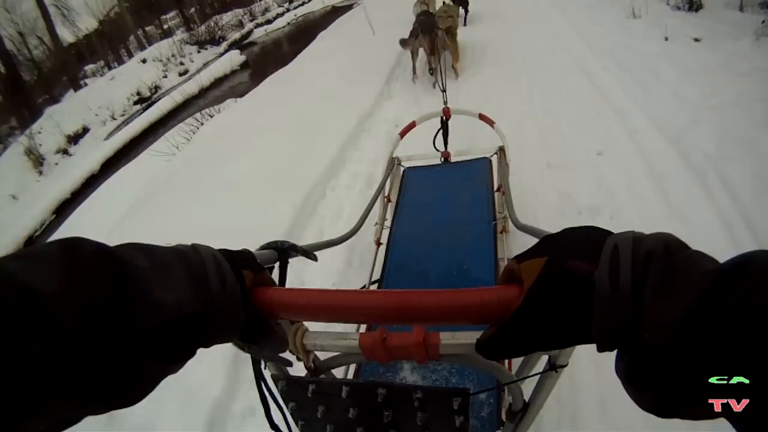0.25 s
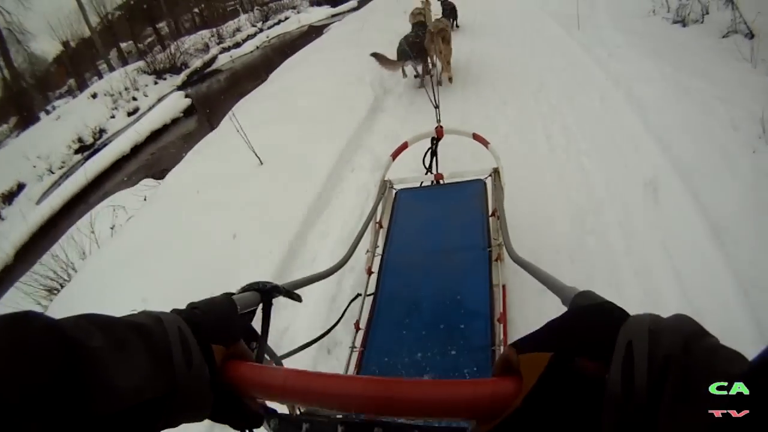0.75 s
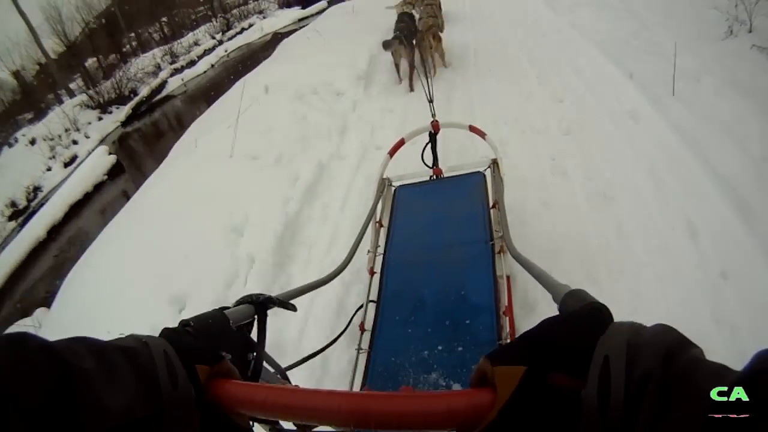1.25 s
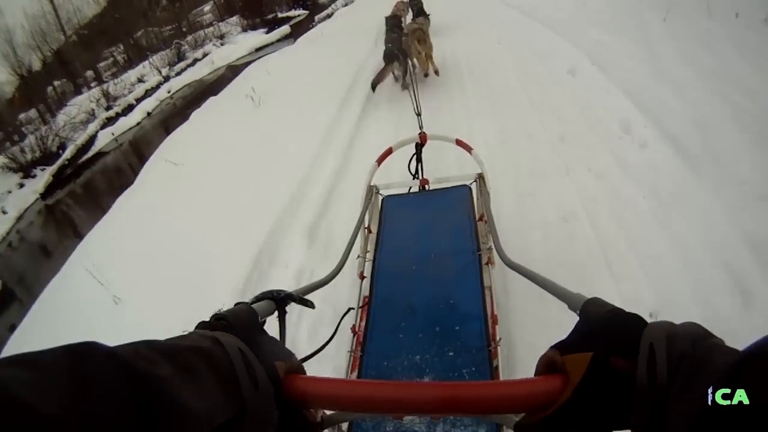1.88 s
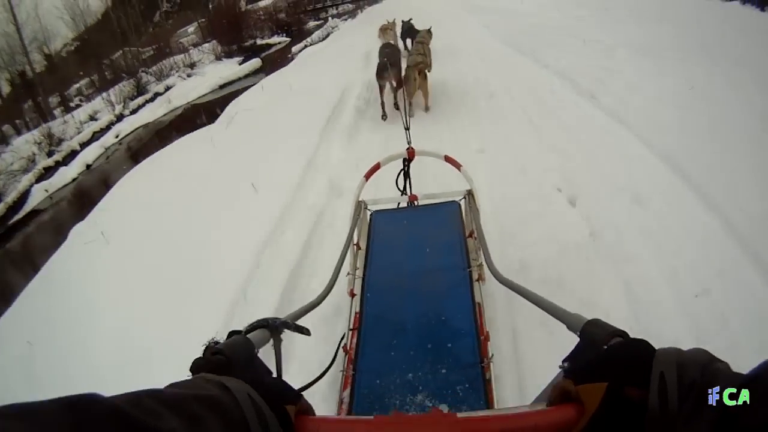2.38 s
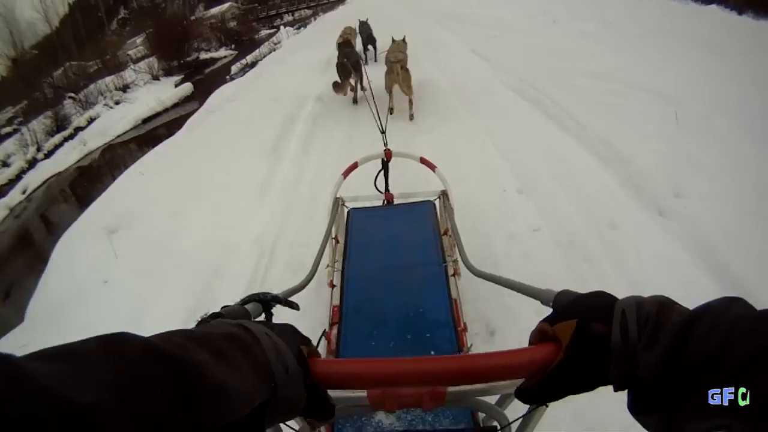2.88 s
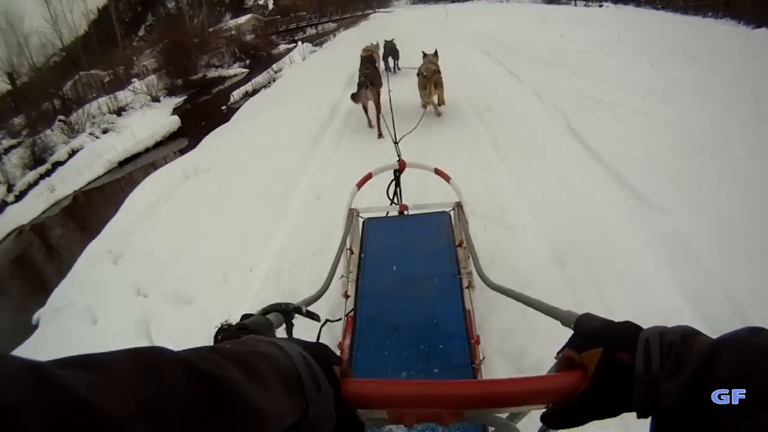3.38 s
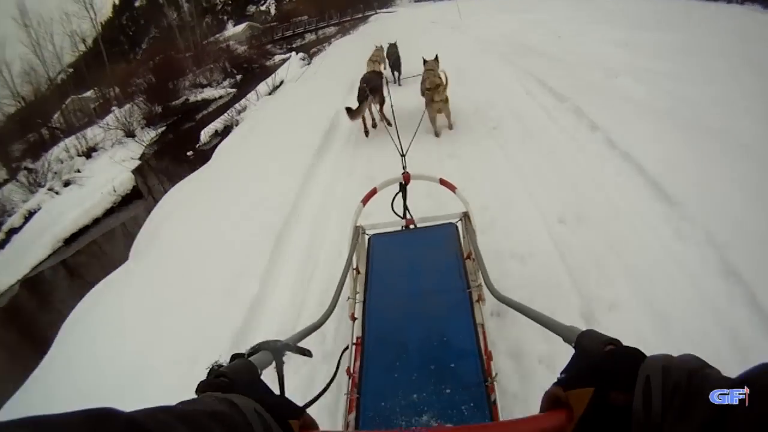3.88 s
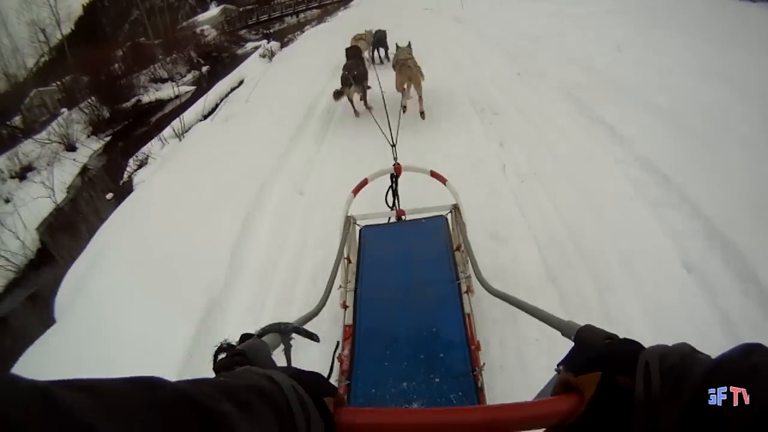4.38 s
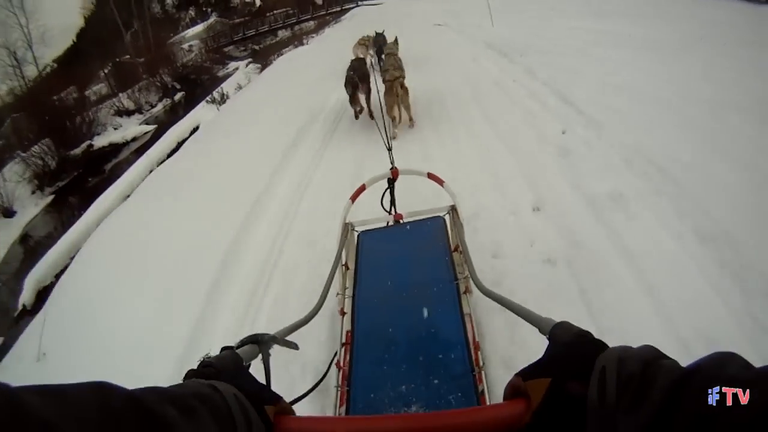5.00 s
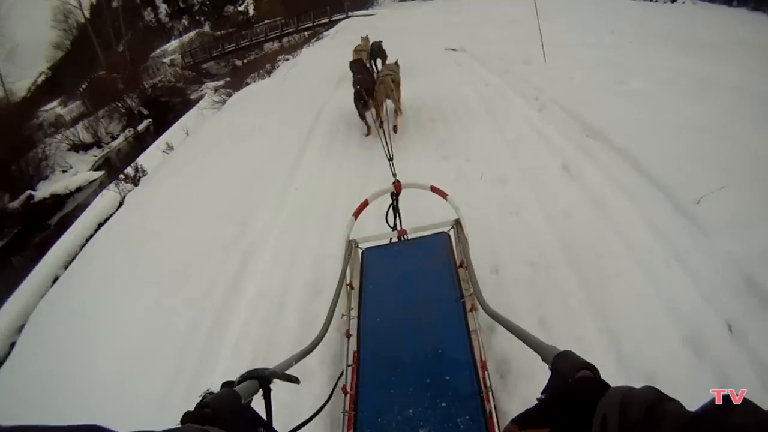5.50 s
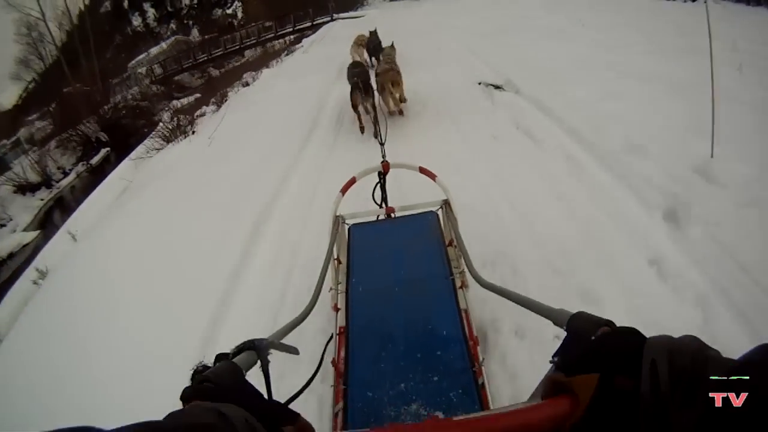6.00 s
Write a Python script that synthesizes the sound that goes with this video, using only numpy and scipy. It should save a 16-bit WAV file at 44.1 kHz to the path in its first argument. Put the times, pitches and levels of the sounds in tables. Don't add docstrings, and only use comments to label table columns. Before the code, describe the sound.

Outdoors on packed snow, a dog sled's runners make a steady, uneven crunchy hiss, heard through a closed plastic case on the driver's chest. Dull low beats recur about three times a second under faint wind rumble. Tiny collar tags tick ahead, frame joints tap and lashings creak. Sharp knocks hit close at about 1.25 seconds, then much louder around 3.6, 4.3 and 6.2.

```python
import sys
import numpy as np
from scipy import signal
from scipy.fft import rfft, irfft
from scipy.io import wavfile
from scipy.ndimage import uniform_filter1d

SR = 44100
rng = np.random.default_rng(int(sys.argv[2]) if len(sys.argv) > 2 else 0)


def volts(x):
    e = np.asarray(x, float) / 20
    return 10 ** e


def transcribe(u):
    v = np.clip(np.atleast_2d(u).T, -1, 1)
    q = np.round(v * 32767).astype(np.int16)
    wavfile.write(sys.argv[1], SR, q)


N = 275184
TIME = np.arange(N) / SR


def unit(x):
    return x / np.sqrt(np.mean(x ** 2))


def band(x, lo_hz, hi_hz, order=2):
    return signal.sosfilt(signal.butter(order, [lo_hz, hi_hz], "band", fs=SR, output="sos"), x)


def walk(rate):
    k = max(int(SR / rate), 1)
    held = np.repeat(rng.standard_normal(N)[:N // k + 1], k)
    return 1.3 * uniform_filter1d(uniform_filter1d(held, k), k)[:N]


def bump(s, length):
    return np.exp(-(2 * (TIME - s) / length) ** 2)


def add(out, s, piece):
    i = int(s * SR)
    out[i:i + len(piece)] += piece[:len(out) - i]


def response(peaks, dips, size=4096):
    hz = np.arange(size // 2 + 1) * SR / size
    power = volts(-25) ** 2
    for f, width, db in peaks:
        power = power + volts(db) ** 2 / (1 + (2 * (hz - f) / width) ** 2) ** 2
    log_gain = np.log(power) / 2
    for f, width, db in dips:
        log_gain = log_gain + np.log(volts(db)) / (1 + (2 * (hz - f) / width) ** 2)
    fold = np.r_[1, 2 * np.ones(size // 2 - 1), 1, np.zeros(size // 2 - 1)]
    return irfft(np.exp(rfft(irfft(log_gain) * fold)))[:size // 2]


# (frequency [Hz], density [dB per Hz])
HISS_COLOUR = [(60, 0), (150, -11.5), (250, -14.5), (350, -17.5), (500, -19), (800, -17.5), (1000, -62),
               (3000, -64), (11000, -40)]


def hiss(db):
    hz = np.maximum(np.arange(N // 2 + 1) * SR / N, 1)
    colour_hz, colour_db = np.transpose(HISS_COLOUR)
    colour = np.interp(np.log(hz), np.log(colour_hz), colour_db, left=-40)
    noise = unit(irfft(rfft(rng.standard_normal(N)) * volts(colour), N))
    return volts(db + 0.5 * walk(5)) * noise


# (time [s], peak level [dB], sway [Hz], decay [ms])
STRAP_BEATS = [(0.26, -34, 42.6, 24), (0.625, -22, 35, 19), (0.982, -22.5, 38.6, 36), (1.336, -29, 37, 22),
               (1.696, -27, 41.5, 45), (2.059, -25.5, 33.3, 49), (2.416, -26.5, 49, 27),
               (2.773, -30, 48.4, 27), (3.153, -30, 26.8, 49), (3.507, -23, 30.6, 44),
               (3.863, -25, 33.2, 31), (4.214, -32.5, 35.0, 15), (4.574, -25.5, 38.3, 30),
               (4.933, -26.5, 35.4, 41), (5.275, -32.5, 47, 75), (5.642, -23, 34.2, 27),
               (5.996, -23.5, 35.2, 39)]


def strap_beats():
    out, t = np.zeros(N), np.arange(8000) / SR
    pull_s = .021
    after = np.maximum(t - pull_s, 0)
    for s, db, hz, decay_ms in STRAP_BEATS:
        turns = np.cumsum(hz * (.6 + 1.1 * np.exp(-after / .014))) / SR
        sway = -np.cos(2 * np.pi * (turns - np.interp(pull_s, t, turns)))
        rise = np.minimum(t / (pull_s + .005), 1) ** 3
        fade = np.exp(-np.maximum(after - .008, 0) / (decay_ms * 1e-3))
        add(out, s, volts(db - 6.5) * rise * fade * sway)
    return out


# (time [s], gust level [dB])
WIND_GUSTS = [(0.0, -51), (1.43, -54), (1.61, -50), (1.91, -57.5), (3.82, -50.5), (4.22, -53.5),
              (5.09, -49), (6.24, -51.5)]


def wind():
    wake_db, wake_after_s, wake_s = 3.5, 0.11, 0.044
    gust_db = np.interp(TIME, *np.transpose(WIND_GUSTS))
    wakes = sum(bump(s + wake_after_s, 2 * wake_s) for s, *_ in STRAP_BEATS)
    rumble_db = gust_db + 1.5 + wake_db * wakes + 1.7 * walk(25)
    flutter_db = -67 + 0.33 * (gust_db - gust_db.mean()) + 1.4 * walk(19) + 0.91 * walk(74)
    slow = band(rng.standard_normal(N), 12, 42)
    quick = band(rng.standard_normal(N), 75, 180)
    return unit(slow) * volts(rumble_db) + unit(quick) * volts(flutter_db)


def small_metal(hits, modes):
    out, t = np.zeros(N), np.arange(4000) / SR
    swell = 1 - np.exp(-t / .004)
    for s, db in hits:
        ring = 0
        for f, t60, mode_db in modes:
            detune = 1 + .007 * rng.standard_normal(2)
            pair = np.sin(2 * np.pi * f * np.outer(detune, t)).mean(axis=0)
            ring = ring + volts(mode_db - 60 * t / t60) * pair
        add(out, s, volts(db - 6) * ring * swell)
    return out


# (time [s], peak level [dB])
TAG_TICKS = [(0.5511, -49), (0.6035, -30), (0.68, -39), (0.7078, -33), (0.7314, -37), (0.8235, -33),
             (0.852, -37), (0.88, -39), (0.9274, -29.5), (0.9624, -31.5), (0.9884, -35), (1.035, -45),
             (1.8264, -33.5), (1.9174, -34), (2.1114, -49), (2.4404, -32), (2.5955, -36), (3.8442, -37),
             (3.8804, -39), (4.7544, -31), (5.0664, -29), (5.6814, -54), (5.8035, -32), (6.1205, -31)]
# (frequency [Hz], t60 [s], level [dB])
TAG_PARTIALS = [(4430, .05, 0), (7580, .04, -3)]


def collar_tags():
    return small_metal(TAG_TICKS, TAG_PARTIALS)


# (time [s], peak level [dB])
LINE_SNAPS = [(2.995, -23)]
# (frequency [Hz], t60 [s], level [dB])
SNAP_PARTIALS = [(2620, 0.041, 5.5), (9400, 0.065, -7)]


def line_snap():
    return small_metal(LINE_SNAPS, SNAP_PARTIALS)


# (centre [Hz], width [Hz], level [dB])
ICE_BANDS = [(5250, 300, 1.5), (6700, 330, 0.5), (1150, 200, -1.3), (366, 220, -6)]


def ice_streak():
    start_s, length_s, db, fade_s = 1.497, 0.23, -57.5, 0.054
    t = TIME - start_s
    gate = np.clip(np.minimum(t / 2, length_s - t) / fade_s, 0, 1)
    noise = rng.standard_normal(N) * volts(3.2 * walk(60))
    scrape = sum(volts(db + d) * unit(band(noise, f - w / 2, f + w / 2)) for f, w, d in ICE_BANDS)
    return gate * scrape


# (time [s], level [dB], centre [Hz], width [Hz],
# decay [ms])
CRUST_RIDGES = [(2.472, -41, 1170, 220, 42), (2.473, -42, 124, 55, 54), (2.49, -55, 9500, 900, 160),
                (3.789, -47.5, 184, 150, 47), (3.844, -40, 1760, 1540, 31), (4.109, -47, 200, 210, 55),
                (4.124, -40.5, 1680, 1200, 33), (4.831, -51.5, 194, 130, 62), (1.93, -57, 268, 90, 31),
                (2.841, -55, 250, 110, 27), (3.543, -42, 1000, 600, 7), (4.751, -56, 5000, 5000, 25),
                (5.06, -49, 5100, 5000, 34.3), (5.03, -54, 210, 200, 25), (.42, -54, 140, 90, 70)]


def crust_ridges():
    out, t = np.zeros(N), np.arange(12000) / SR
    for s, db, hz, width, decay_ms in CRUST_RIDGES:
        noise = rng.standard_normal(len(t))
        burst = unit(band(noise, max(hz - width / 2, 20), hz + width / 2))
        swell = (1 - np.exp(-t / 0.0059)) * np.exp(-t / (decay_ms * 0.0011))
        add(out, s, volts(db) * burst * swell)
    return out


# (frequency [Hz], width [Hz], level [dB])
MOUNT_MODES = [(627, 81, -12), (1290, 380, -5.5), (1600, 72, -31), (2112, 374, 11), (3474, 585, 11.5),
               (4770, 630, 13.5), (7040, 350, 1), (8630, 570, 3), (9954, 440, 3), (13900, 380, -38.5)]
# (frequency [Hz], width [Hz], gain [dB])
MOUNT_NOTCHES = [(5940, 170, 2), (4110, 350, -15)]


def knocks(rows, bright_db):
    out, t = np.zeros(N), np.arange(1500) / SR
    mount = response(MOUNT_MODES, MOUNT_NOTCHES)
    for s, db, hz, push_ms, crack_db in rows:
        noise = rng.standard_normal(len(t))
        u = t / (push_ms * 0.0012)
        push = u * np.exp(-u ** 2)
        tone = np.sin(2 * np.pi * hz * t)
        ring = np.convolve(push * (tone + 0.96 * noise), np.exp(-t * hz / 1.56) * tone)[:len(t)]
        ring = band(ring, 0.52 * hz, 17000, order=1)
        rough = band(noise, 600, 4200) + volts(bright_db) * band(noise, 4200, 16000)
        crack = np.convolve(push * rough, mount)[:len(t)]
        thud = band(push * noise, 250, 900) + .3 * band(push, 250, 900)
        parts = (ring, 0), (crack, crack_db), (thud, -40.5)
        hit = sum(volts(part_db) * part / np.abs(part).max() for part, part_db in parts)
        add(out, s, volts(db) * hit / np.abs(hit).max())
    return out


# (time [s], peak level [dB], ring [Hz])
LASHING_CREAKS = [(.929, -34, 2270), (1.177, -35, 2620), (2.985, -37, 1980), (3.414, -35, 1896),
                  (3.883, -30, 2560), (4.15, -26, 1600), (4.175, -28, 1730), (4.64, -35.5, 2180)]


def lashing_creaks():
    push_ms, crack_db = 4.3, 3.5
    return knocks([(*row, push_ms, crack_db) for row in LASHING_CREAKS], bright_db=-2)


# (time [s], peak level [dB], ring [Hz], push [ms], crack over ring [dB])
SOFT_KNOCKS = [(0.077, -32, 1115, 1.9, 0), (.077, -44, 260, 2, -18), (1.8755, -45.5, 380, 1.2, -20),
               (1.3, -45.5, 640, 1.5, -20), (1.2352, -22, 2010, 2.1, -2), (1.3, -28, 1600, 1.7, 6),
               (1.299, -36, 1000, 2.2, -6), (1.347, -33.5, 1130, 2.7, -1.5), (1.3488, -48, 298, 1.7, -15),
               (1.8745, -30.5, 1860, 1.5, -3), (1.877, -38, 680, 2.1, -7), (1.876, -34.5, 1110, 0.99, 1),
               (1.893, -41, 1720, .95, -3), (2.096, -38, 286, 1.4, -1), (4.959, -25.5, 1685, 4, 7.5),
               (5.182, -30, 1170, 3.3, -1), (5.181, -44, 275, 2.5, -20), (5.2602, -25.5, 1065, 2, -4),
               (5.262, -40.5, 630, 3.7, -32), (5.263, -26, 1780, 0.66, -14)]


def soft_knocks():
    return knocks(SOFT_KNOCKS, bright_db=-3)


# (time [s], peak level [dB], ring [Hz], push [ms], crack over ring [dB])
MOUNT_BLOWS = [(1.253, -13.5, 2010, 0.89, 7), (1.2536, -11, 3210, 1.74, 1.5), (1.253, -20, 4760, 1.6, -2),
               (3.5665, -4.5, 3190, .89, 1.5), (3.5671, -8.5, 5260, 0.95, -15),
               (3.5678, 3, 2040, 1.26, -1.5), (4.2763, -11, 1170, 1.2, 7), (4.279, 4, 1955, 0.52, -2),
               (4.282, -14, 1700, 3.3, -3), (4.2894, 6.5, 2110, .8, 4), (4.2909, -2, 1457, 1.28, -16),
               (4.2893, -24.5, 220, 1.2, -18), (4.2787, -8, 1155, 1.12, -2.5),
               (4.2797, -6.5, 3447, 1.5, -2), (5.174, -15, 1770, 1.25, 4), (5.1759, -14.5, 1943, 2.7, -6),
               (6.1901, 3, 2095, 1.53, 1.5), (6.1909, -0.5, 3614, 1.2, -4), (6.1904, -25, 570, 1, -7),
               (6.197, -5, 2020, 1.7, -4), (6.1975, -14, 1150, 1.5, -12), (6.2087, -1, 1990, 1.04, 7),
               (6.2107, -14, 2030, 2.4, 24), (6.238, -22, 1330, 1.5, 0)]


def mount_blows():
    return knocks(MOUNT_BLOWS, bright_db=-2)


# (frequency [Hz], width [Hz], level [dB])
CASE_MODES = [(670, 150, -14), (1170, 300, -5), (1540, 140, -7), (1700, 160, -6), (1960, 240, -1),
              (2190, 170, 0), (2590, 200, -1), (2830, 300, -4), (3460, 230, -2), (3720, 300, -6),
              (4120, 240, -11), (4480, 300, -10), (4850, 280, -13), (5370, 450, -13), (6580, 450, -13),
              (7130, 340, -16), (7580, 240, -15), (7900, 220, -17), (8330, 280, -13), (8530, 160, -9),
              (9150, 260, -16), (9400, 250, -14), (9820, 200, -14), (10080, 320, -16), (10900, 320, -25)]
# (frequency [Hz], width [Hz], depth [dB])
CASE_NOTCHES = [(1410, 80, -3), (2380, 100, -.3), (3130, 150, -.3), (6000, 250, -4), (8870, 150, -2.5),
                (9620, 120, -4), (10590, 120, -8)]
# (middle [s], length [s], lift [dB], weight on the runner [dB])
SNOW_PATCHES = [(.06, 0.18, 0, 4.5), (.24, .12, -4, -0.5), (.36, 0.25, 3, 2.5), (.58, 0.22, 1.5, 2.5),
                (.8, 0.23, -2, -0.5), (.96, .12, -1.5, 2.5), (1.14, 0.16, -1.1, 4), (1.62, 0.26, 2.5, -2.7),
                (1.84, 0.15, -2.4, 1.1), (2.38, 0.13, -1.3, -2.1), (2.57, 0.17, 5, 3), (2.72, 0.21, 2, 1.1),
                (3.02, 0.31, 2, 1), (3.431, 0.078, 6, -3), (3.6, 0.2, -2.5, 5.5), (3.73, 0.088, 4, 0),
                (3.85, 0.11, 3.5, -2.5), (4.01, 0.23, -2, 5), (4.16, 0.1, 6.5, 0), (4.32, .14, 3.5, 3.5),
                (4.43, 0.13, -4, 3), (4.56, .16, 5, -1.8), (4.92, 0.065, 3, 2), (5.07, 0.11, 4, -5),
                (5.2, 0.28, 1.5, 1), (5.65, 0.073, 2, 3), (5.95, 0.56, 2.15, -2.5), (6.13, 0.19, -2.2, -1)]


def runners():
    lift = sum(db * bump(s, length) for s, length, db, _ in SNOW_PATCHES)
    weight = sum(load * bump(s, length) for s, length, _, load in SNOW_PATCHES)
    groan_db = -61.5 + 1.6 * lift + weight
    hiss_db = -50 + lift
    grit_db = -55 + 0.65 * lift - 0.2 * weight
    size = np.minimum(rng.exponential(size=N), 4)
    grains = rng.standard_normal(N) * (rng.random(N) < .02) * volts(3.0 * size)
    snow = rng.standard_normal(N) + volts(-7) * unit(grains)
    spectrum = rfft(signal.fftconvolve(snow, response(CASE_MODES, CASE_NOTCHES))[:N])
    hz = np.arange(N // 2 + 1) * SR / N
    edges = (850, 1410, 1800, 2380, 3130, 3900, 4700, 6000, 7300, 8000, 8870, 9620, 14000)
    crunch = walk(30)
    parts = []
    for lo, hi in zip(edges, edges[1:]):
        drift_db = 1.1 * crunch + 1.3 * walk(6) + .8 * walk(25)
        parts.append(irfft(spectrum * (hz >= lo) * (hz < hi), N) * volts(drift_db))
    groan, rush, grit = parts[0], sum(parts[1:5]), sum(parts[5:])
    return volts(groan_db) * unit(groan) + volts(hiss_db) * unit(rush) + volts(grit_db) * unit(grit)


def scene():
    chest = hiss(-60.5) + strap_beats() + wind()
    ahead = collar_tags() + line_snap()
    frame = lashing_creaks() + soft_knocks() + mount_blows()
    mid = chest + ahead + frame + ice_streak() + crust_ridges() + runners()
    trace = hiss(-73)
    return mid + trace * np.array([[1], [-1]])


def top_cut(x):
    return signal.sosfilt(signal.butter(12, 10810, fs=SR, output="sos"), x)


def record(dry):
    top_hz, duck_s = 11100, 0.019
    dull = signal.sosfilt(signal.ellip(8, .2, 45, top_hz, fs=SR, output="sos"), dry)
    excess = np.maximum(np.abs(dull[0]) - .5, 0)
    over = signal.lfilter([1], [1, -np.exp(-1 / (duck_s * SR))], excess)
    late = np.r_[np.zeros(200), over[:-200]]
    duck_db = -np.minimum(0.3 * late, 6.0)
    mix = np.clip(dull * volts(duck_db), -1, 1)
    return top_cut(mix)


dry = scene()
out = record(dry)
transcribe(out)
```